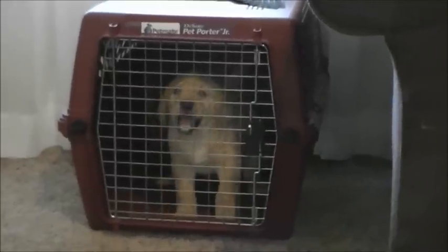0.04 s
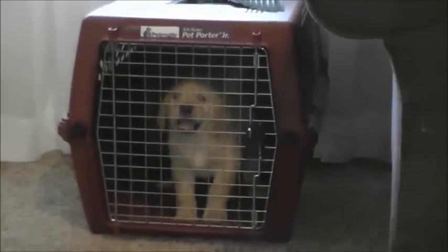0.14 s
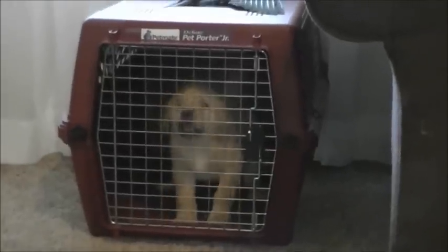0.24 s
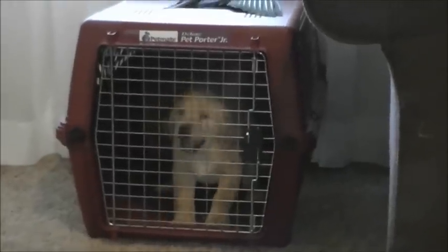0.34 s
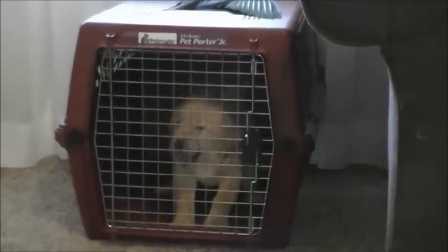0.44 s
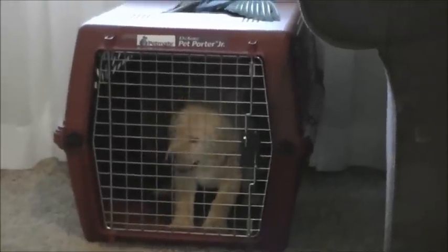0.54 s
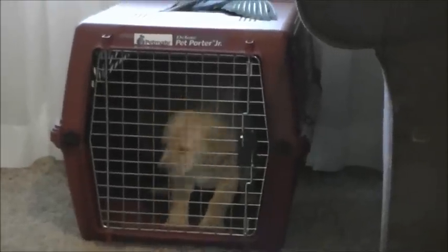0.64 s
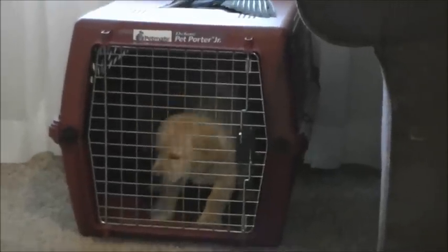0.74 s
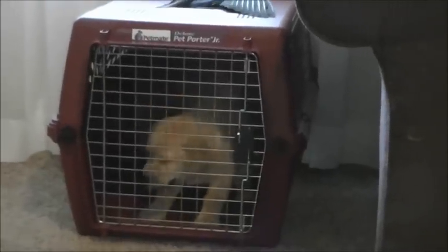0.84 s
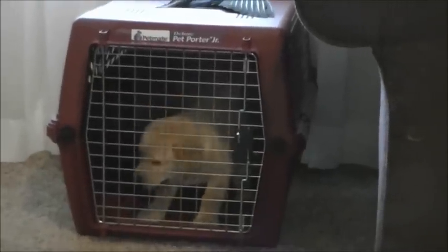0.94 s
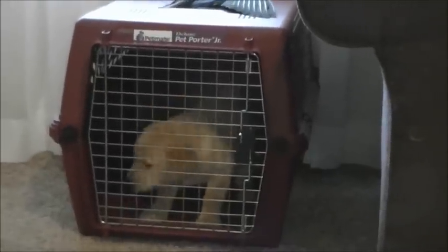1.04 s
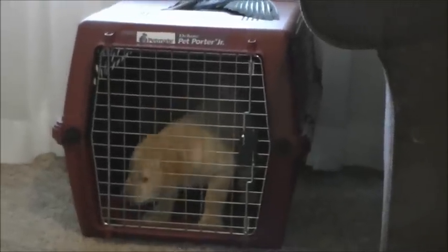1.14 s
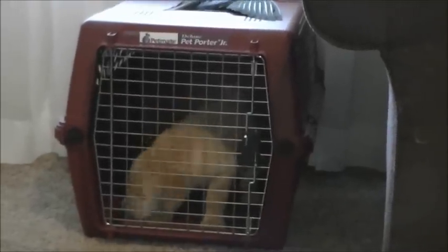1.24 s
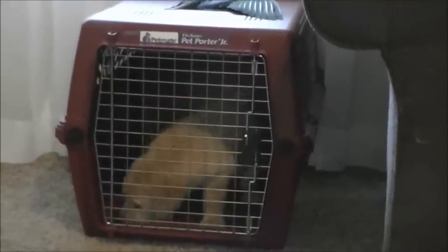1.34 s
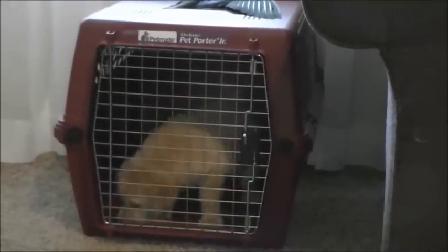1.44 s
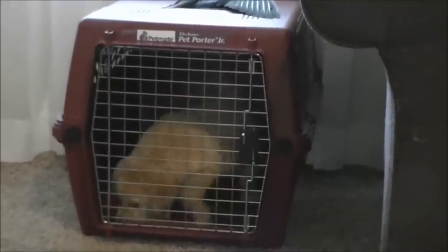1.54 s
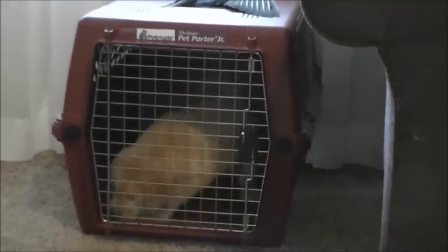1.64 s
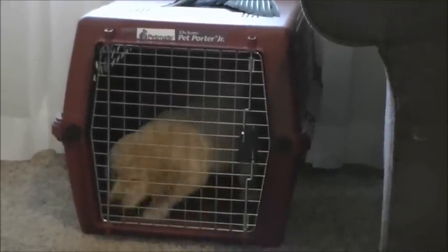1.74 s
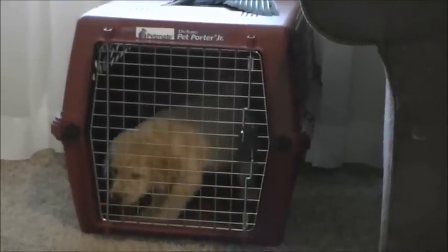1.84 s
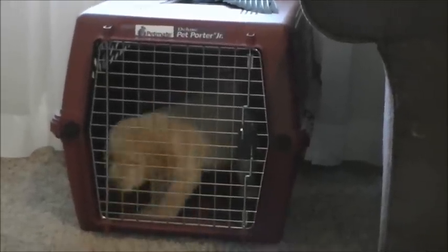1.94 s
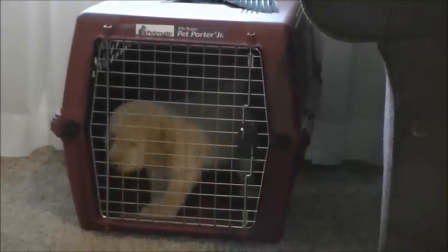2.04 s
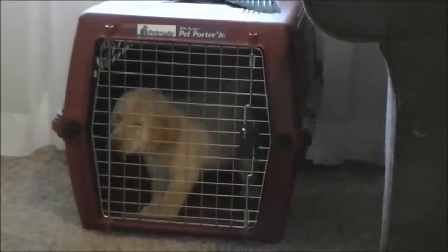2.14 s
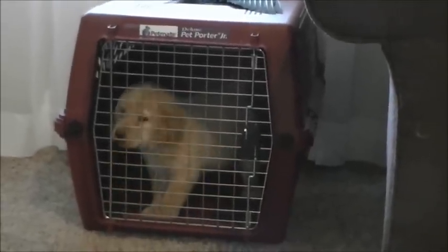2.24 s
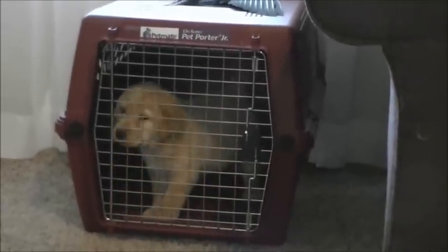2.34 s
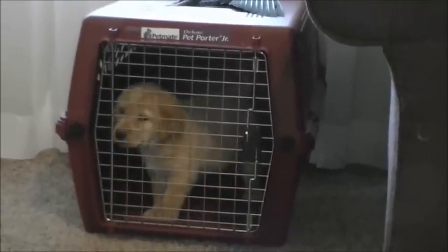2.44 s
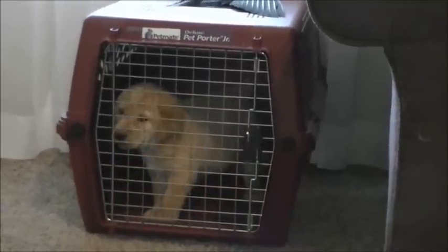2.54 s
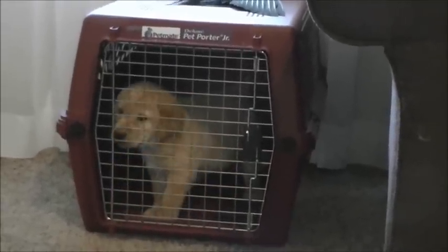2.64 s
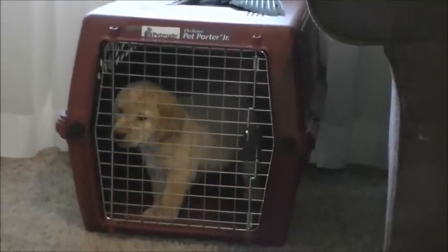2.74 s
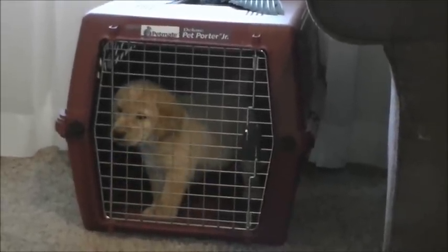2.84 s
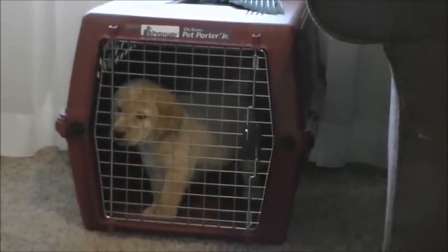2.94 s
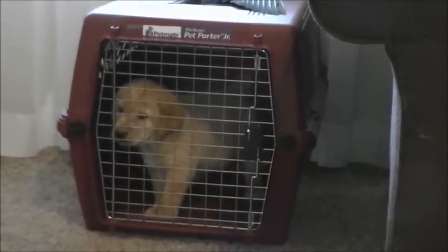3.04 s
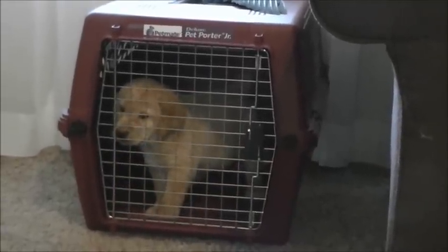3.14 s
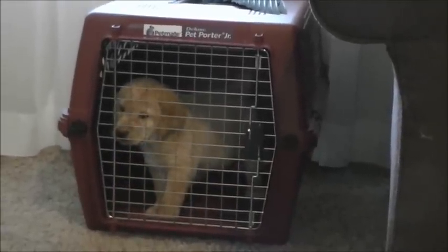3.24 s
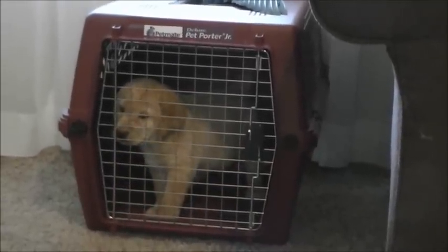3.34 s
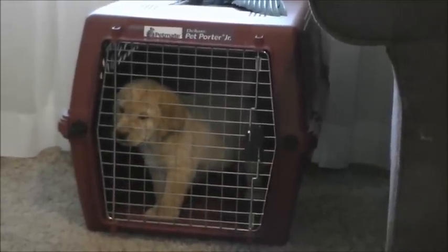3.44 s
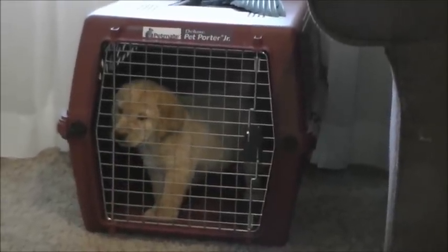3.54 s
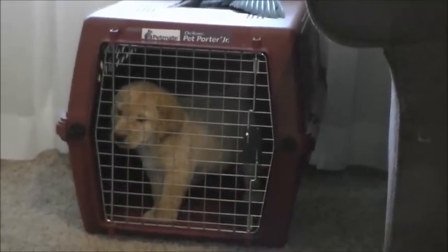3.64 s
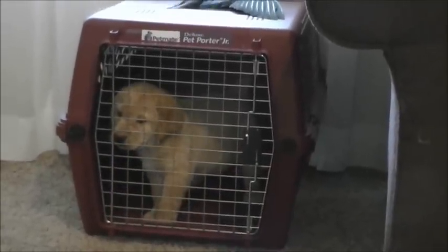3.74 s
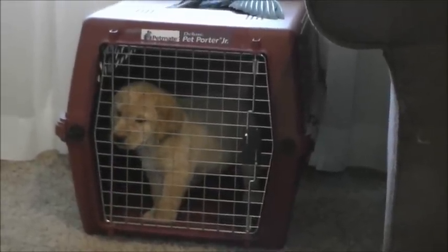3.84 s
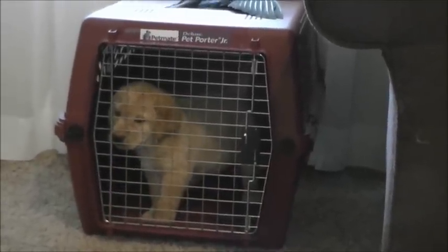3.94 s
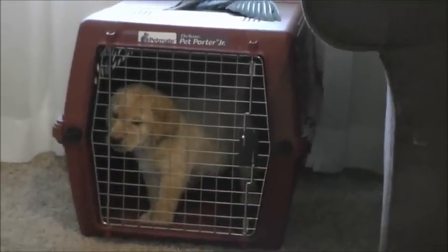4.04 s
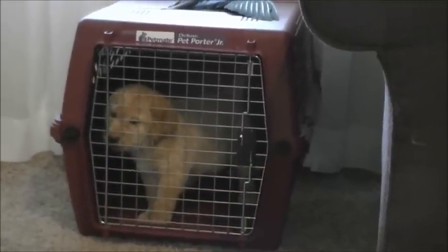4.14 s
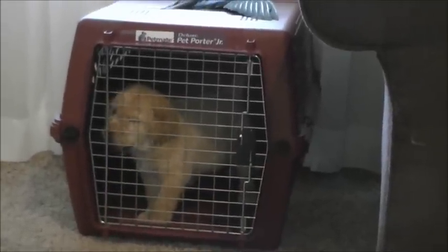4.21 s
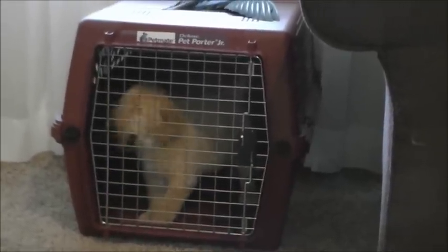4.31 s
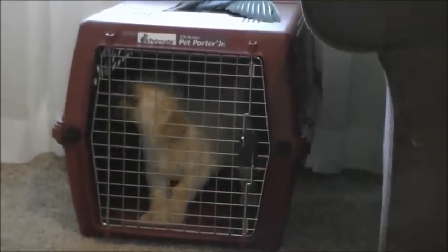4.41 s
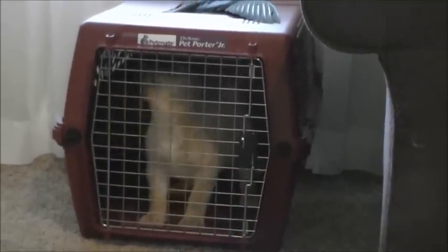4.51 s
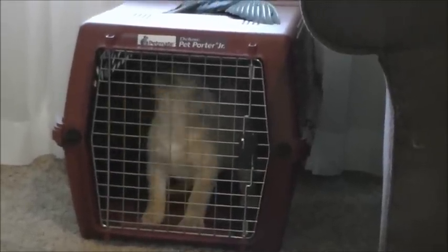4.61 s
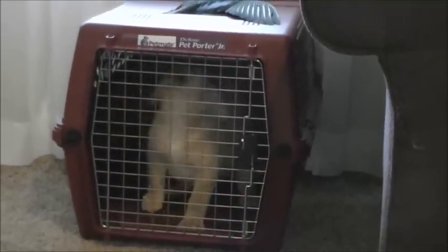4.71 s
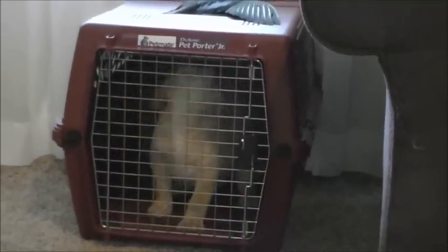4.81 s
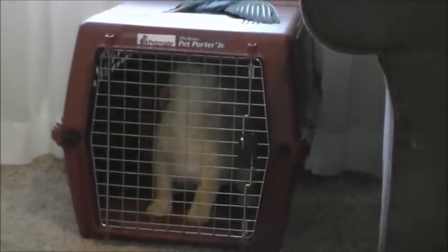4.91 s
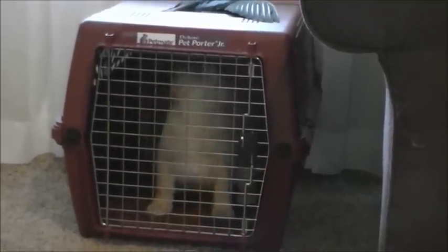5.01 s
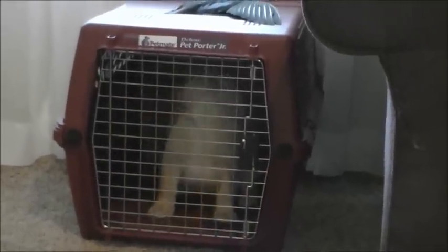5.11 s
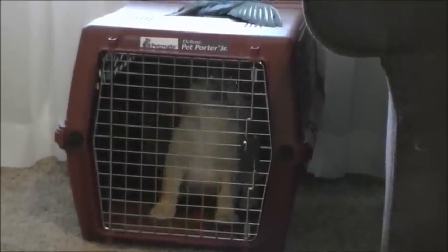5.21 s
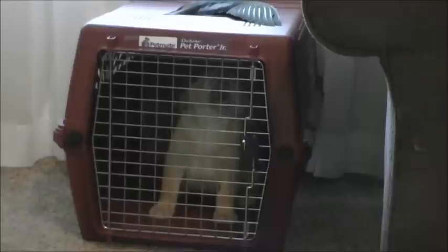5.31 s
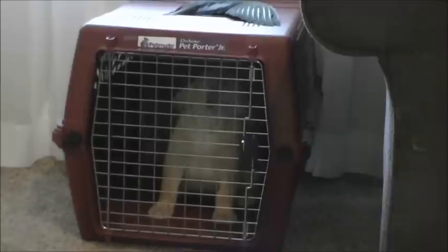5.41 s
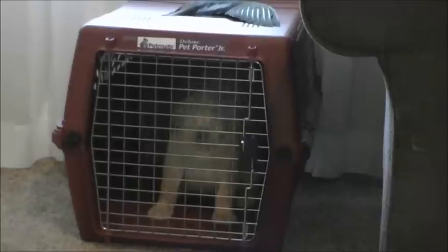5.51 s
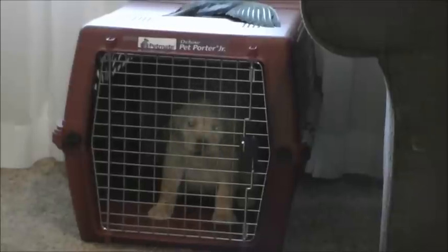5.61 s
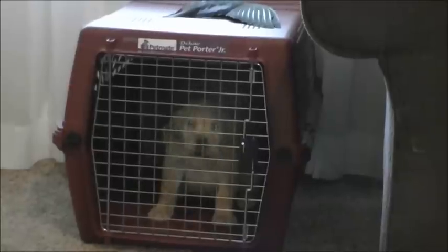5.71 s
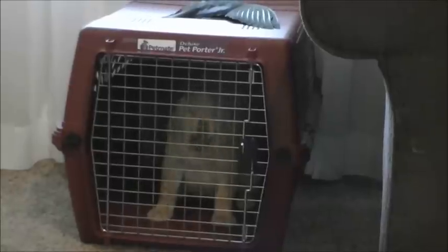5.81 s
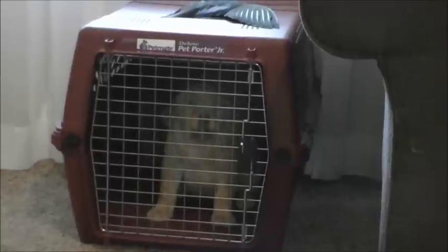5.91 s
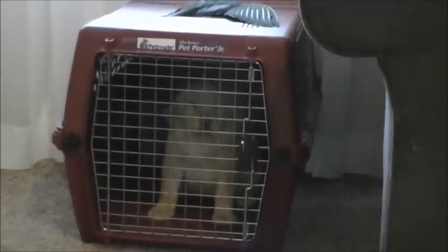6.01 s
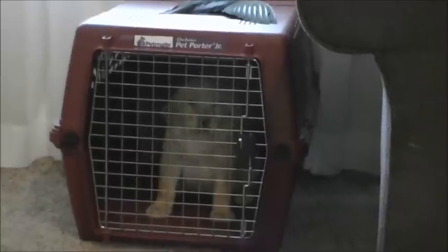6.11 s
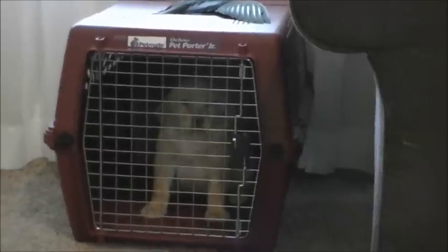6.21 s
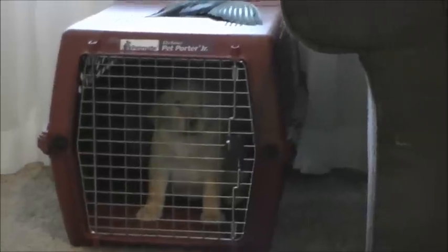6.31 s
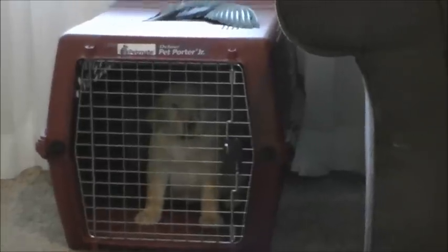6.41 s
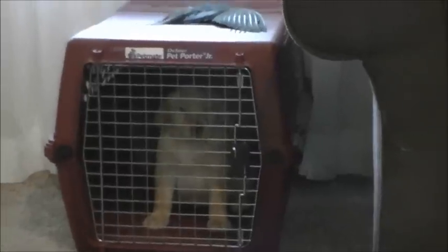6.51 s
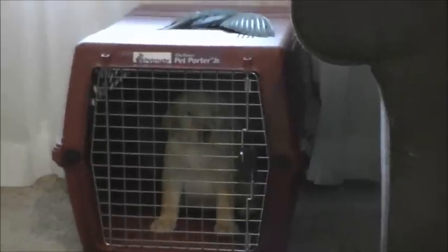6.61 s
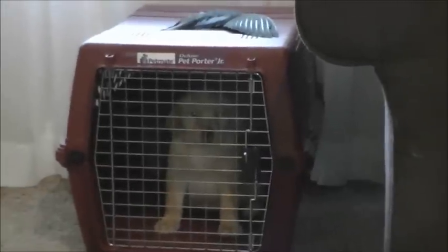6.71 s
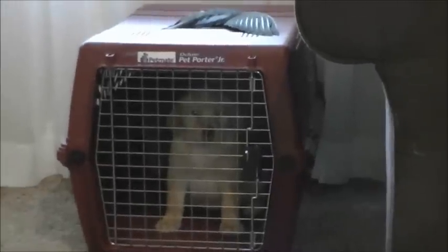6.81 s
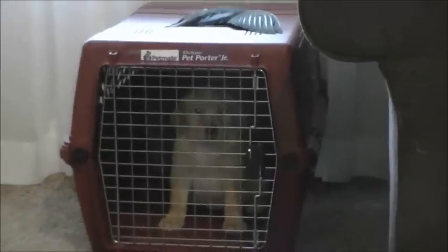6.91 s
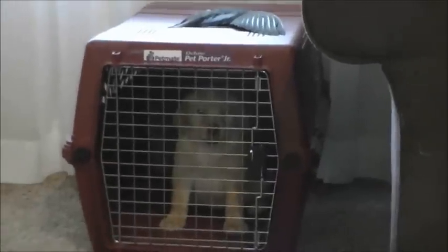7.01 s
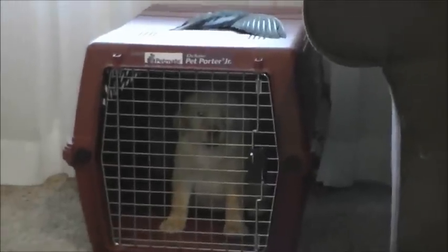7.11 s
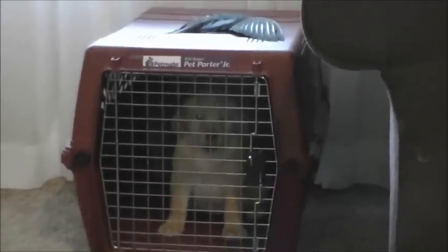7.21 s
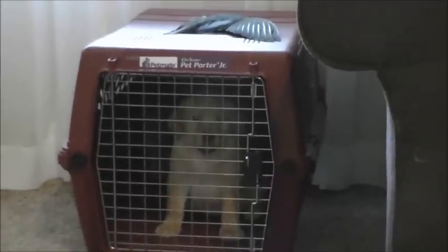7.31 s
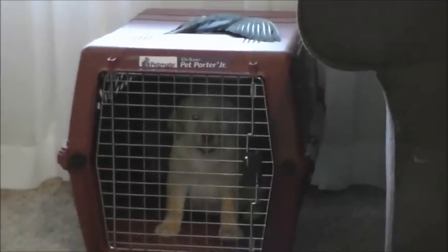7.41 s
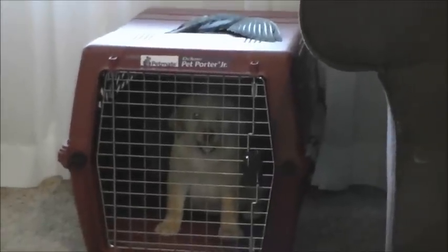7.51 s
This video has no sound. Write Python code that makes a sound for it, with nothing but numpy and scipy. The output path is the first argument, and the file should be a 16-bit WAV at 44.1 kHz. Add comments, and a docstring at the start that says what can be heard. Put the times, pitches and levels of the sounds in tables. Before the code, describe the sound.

A puppy cries in a plastic crate in a carpeted room, over soft air and a faint steady appliance hum. Piercing whines, each falling in pitch, come at 0.0, 0.35 and 0.85 seconds, then a short faint one at 1.35 and a lower, weak one from 1.7 to 1.95. Claw ticks and a sniff fall near 1.45. From 2.2 to 3.9 the puppy is silent; cloth slides close to the microphone, strongest after 3.0, and paws thud and scuff the hollow floor, clustered around 3.6 to 3.75. Another brief rustle at 4.1 leads to four loud yelps at 4.2, 4.8, 5.3 and 5.8, cracking and hoarse, the last sliding down long. Paws bump at 4.67 and 5.15. Two low, falling moans follow at 6.4 and 7.05, with breathy snuffles between and a final one at 7.45. Close crate reflections and a short room tail surround it.

```python
"""A carpeted room, in stereo: a puppy whines and yelps in a plastic crate. Five falling whines, a pause,
four loud yelps that crack and turn hoarse, then two low moans, with snuffles and lone tones.
Its voice is a stack of harmonics shaped by throat and mouth. Paws bump the crate floor as noise thuds
and ringing panel modes; cloth rustles close by as filtered noise; an appliance hums in steady partials.
Crate reflections and a room tail surround the voice and paws."""
import sys
import numpy as np
from scipy import signal
from scipy.fft import rfft, irfft, next_fast_len
from scipy.io import wavfile
from scipy.ndimage import uniform_filter1d, minimum_filter1d

SR = 44100
rng = np.random.default_rng(int(sys.argv[2]) if len(sys.argv) > 2 else 0)


def dump(signal):
    """Clip the signal to [-1, 1] and save it as 16-bit WAV at the path in sys.argv[1]."""
    limited = np.clip(np.atleast_2d(signal).T, -1, 1)
    pcm = np.round(limited * 32767).astype(np.int16)
    wavfile.write(sys.argv[1], SR, pcm)


N = 332955
TIME = np.arange(N) / SR
CUTOFF_HZ = 15800  # top of the voice's harmonics and of the room's response


def from_db(db):
    """Decibels to gain."""
    return 10 ** (np.asarray(db) / 20)


def rms_one(x):
    """Scale to unit power."""
    return x / np.sqrt(np.mean(np.abs(x) ** 2) + 1e-20)


def in_time(rows, t=TIME):
    """The columns of a curve, after its time column, read at the times t."""
    s, *columns = np.transpose(rows)
    return [np.interp(t, s, c) for c in columns]


def at_hz(points, hz):
    """Read a spectrum on a log-frequency axis."""
    f, value = np.transpose(points)
    return np.interp(np.log(hz), np.log(f), value)


def gate(t, start, end, edge_s=0.0009):
    """One between start and end, with smooth edges."""
    inside = np.minimum(t - start, end - t) / edge_s + .5
    return np.sin(np.pi / 2 * np.clip(inside, 0, 1)) ** 2


def band(x, low_hz, high_hz):
    """Causal band-pass."""
    sos = signal.butter(2, [low_hz, min(high_hz, SR / 2 - 1)], "band", fs=SR, output="sos")
    return signal.sosfilt(sos, x + 1e-18)


def flutter(size, hz):
    """Random motion mostly slower than hz, spread about 1, drawn on every 16th sample."""
    n = next_fast_len(size // 16 + 2)
    f = np.fft.rfftfreq(n, 16 / SR)
    slow = rms_one(irfft(rfft(rng.standard_normal(n)) / (1 + (f / hz) ** 2), n))
    return np.interp(np.arange(size) / 16, np.arange(n), slow)


def noise(spectrum, size=N):
    """Stereo noise of a given colour, about unit rms, its channels more alike in some bands than others."""
    # likeness of left and right: f/Hz, correlation [0-1]
    likeness = [(60, 0.9), (140, 0.2), (350, 0.63), (840, 0.5), (2020, 0.55), (4860, 0.47)]
    n = next_fast_len(size)
    hz = np.fft.rfftfreq(n, 1 / SR) + 1
    mid, side = rfft(rng.standard_normal((2, n)))
    alike = np.clip(at_hz(likeness, hz), 0, 1)
    # roll off beyond the first and last points of the spectrum
    low_edge = 1 + (spectrum[0][0] / hz) ** 8
    high_edge = 1 + (hz / spectrum[-1][0]) ** 8
    colour = from_db(at_hz(spectrum, hz)) / np.sqrt(low_edge * high_edge)
    both = np.sqrt(1 + alike) * mid + np.sqrt(1 - alike) * side * [[1], [-1]]
    return rms_one(irfft(both * colour, n)[:, :size])


def add(out, s, sound):
    """Mix a sound in at time s."""
    i = max(int(s * SR), 0)
    out[..., i:i + sound.shape[-1]] += sound[..., :N - i]


def background(air_db=-46, hum_db=-1, waver_db=0.0):
    """Room air as coloured noise, and an appliance's partials, their phases wavering slowly."""
    # the background sinks and swells: t/s, relative level/dB
    swells = [(0, -1), (.6, -7.5), (1.3, -5), (2.2, -3), (3, -0.5), (4.2, 2), (4.3, -10.5), (5.1, -10.5),
              (6, -5), (6.6, -3), (7.55, -3)]
    # colour of the room air: f/Hz, relative level/dB
    air_colour = [(25, -35.5), (60, -18.5), (110, -14.5), (220, -16), (300, -8.5), (400, -12), (450, -16.5),
                  (600, -11.5), (900, -20), (1800, -22), (3000, -29.5), (8000, -38.5), (11000, -43),
                  (15500, -70)]
    # appliance partials: f/Hz, rms level before the trims/dB
    partials = [(118.4, -57.5), (199.2, -60.5), (339.1, -57.5), (398.4, -51), (845.2, -60.5)]
    hum = np.zeros(N)
    for hz, db in partials:
        level = from_db(db + hum_db + waver_db * flutter(N, 5))
        hum += level * np.sqrt(2) * np.sin(2 * np.pi * hz * TIME + 0.28 * flutter(N, 1.5))
    return from_db(in_time(swells)[0]) * (from_db(air_db) * noise(air_colour) + hum)


def cloth(grain_db=1.5, edge_s=0.054, swell_db=8.5):
    """Cloth slides close by in strokes that swell and fade: a dull rub and a grainy hiss."""
    # strokes: start t/s, end t/s, rub level/dB, hiss level/dB (both midway, before the output trim)
    strokes = [(2.221, 2.803, -54.5, -49.5), (2.8, 2.983, -57, -53), (3.002, 3.652, -43, -45.5),
               (3.63, 3.902, -42.5, -54), (4.093, 4.24, -43.5, -43)]
    # colour of the rub: f/Hz, relative level/dB
    rub_colour = [(150, -8), (270, -17.5), (550, -12), (1100, -15.5), (2400, -20), (3500, -37)]
    # colour of the hiss: f/Hz, relative level/dB
    hiss_colour = [(2000, 3), (3000, 4), (5500, 0.5), (7000, 2), (9000, -2), (11000, -11.5), (13000, -18),
                   (15500, -31)]
    rub, hiss = np.zeros((2, N))
    for start, end, rub_db, hiss_db in strokes:
        off_centre = (2 * TIME - start - end) / (end - start)
        # weaker by swell_db at its ends than midway
        swell = from_db(-swell_db * np.minimum(off_centre ** 2, 2))
        stroke = gate(TIME, start, end, edge_s) * swell
        rub += from_db(rub_db) * stroke
        hiss += from_db(hiss_db) * stroke
    grain = from_db(grain_db * flutter(N, 60))
    return rub * noise(rub_colour) + hiss * grain * noise(hiss_colour)


def room(x, tail_db=-13, crate_db=-15, crate_t60_s=0.017, ring_t60_s=1.0):
    """Quick reflections inside the crate, then the room's tail, dying band by band, and its ringing modes."""
    # colour of the tail: f/Hz, relative level/dB
    tail_colour = [(300, 8.5), (700, 3), (1200, 6.5), (2500, 1.5), (4200, 7), (7000, 4.5), (12000, 2.5)]
    # left-right difference of the reflections: f/Hz, level against the middle/dB
    side_width = [(300, -9.5), (1200, -11), (4500, -6), (8000, -20.5), (14000, 9.5)]
    # pitches at which the room rings on: f/Hz, relative level/dB
    rings = [(1125, -20), (1384, -14), (2650, 5), (2854, -1), (3381, -54), (4167, -40)]
    # the tail lasts longest in the middle register and shortens by about this share an octave either side
    longest_t60_s, longest_hz, shortening = 0.7, 1270, 0.089
    t = np.arange(SR * 3 // 4) / SR
    edges = np.geomspace(100, CUTOFF_HZ, 9)
    response = np.zeros((2, len(t)))  # middle and side
    for low, high in zip(edges, edges[1:]):
        hz = np.sqrt(low * high)
        t60_s = longest_t60_s * np.exp(-shortening * abs(np.log2(hz / longest_hz)))
        tail = rms_one(from_db(-60 * t / t60_s) * gate(t, 0.0089, 1))
        early = rms_one(from_db(-60 * t / crate_t60_s) * (t > .002))
        tail_gain = from_db(tail_db + at_hz(tail_colour, hz))
        shape = np.hypot(tail_gain * tail, from_db(crate_db) * early)
        width = from_db([[0], [at_hz(side_width, hz)]])
        grains = band(rng.standard_normal((2, len(t))), low, high)
        response += grains * shape * width / np.sqrt(len(t))
    fade = from_db(-60 * t / ring_t60_s)
    for hz, db in rings:
        response[0] += from_db(db) * np.sin(2 * np.pi * hz * t) * 2 * fade / fade.sum()
    mid, side = signal.fftconvolve(x[None], response, axes=1)[:, :N]
    return x + mid + side * [[1], [-1]]


def paws(thud_db=2, knock_db=-1, scuff_db=-3, thud_t60_s=0.18, scuff_t60_s=0.2, panel_t60_s=0.11,
         touch_s=0.0043, claw_db=-10, claw_t60_s=0.082):
    """Soft paws thud and scuff on the floor and set the panel ringing; claws add ticks of bright noise."""
    # paws on the crate floor: t/s, thud level/dB, panel and scuff level/dB (before the trims)
    footfalls = [(0.162, -38.5, -60), (0.9, -51, -45), (2.058, -62, -48), (2.236, -65, -49),
                 (2.863, -42, -55), (3.601, -39, -62), (3.638, -38, -42), (3.68, -41, -25.5),
                 (3.704, -54, -30.5), (3.748, -50, -48), (4.666, -47, -29.5), (5.146, -40, -31),
                 (5.18, -41, -29)]
    # ringing modes of the floor panel: f/Hz, typical relative level/dB
    panel_modes = [(338, 7), (393, 15), (502, 2), (700, -43), (800, -26), (1114, -11), (1410, 3), (2250, 2),
                   (2550, -4)]
    # claws on the plastic and the wire door: t/s, level before the trims/dB
    ticks = [(1.4414, -31), (1.4924, -29.5), (4.6697, -36), (5.1405, -37), (5.157, -39), (5.1819, -40),
             (6.845, -69)]
    out, t = np.zeros(N), np.arange(SR // 2) / SR

    def burst(low_hz, high_hz, db, t60_s):
        """Band noise that dies away exponentially."""
        return rms_one(band(rng.standard_normal(len(t)), low_hz, high_hz)) * from_db(db - 60 * t / t60_s)

    hz, mode_db = np.transpose(panel_modes)[:, :, None]
    for s, low_db, panel_db in footfalls:
        thud = burst(106, 196, thud_db, thud_t60_s)
        scuff = burst(410, 1050, scuff_db, scuff_t60_s)
        # each bump excites the modes in a different mixture
        strength = from_db(mode_db) * rng.normal(1, 1.0, hz.shape) * rng.choice([-1, 1], hz.shape)
        ringing = (strength * np.sin(2 * np.pi * hz * t)).sum(0) / np.linalg.norm(strength)
        knock = ringing * from_db(knock_db - 60 * t / panel_t60_s)
        bump = from_db(low_db) * thud + from_db(panel_db) * (knock + scuff)
        add(out, s, bump * (1 - np.exp(-t / touch_s)))
    for s, db in ticks:
        add(out, s, burst(4900, 7700, db + claw_db, claw_t60_s))
    return out


def snuffles(grain_db=4.0, rise_db=6, trim_db=1.0, edge_s=0.032):
    """Short breaths: noise coloured by the snout, with one mouth resonance, swelling towards the end."""
    # snuffles: start t/s, end t/s, level before the trims/dB, mouth resonance f/Hz
    breaths = [(1.412, 1.504, -43.5, 5050), (1.92, 1.932, -46, 8450), (2.037, 2.081, -49, 1410),
               (6.278, 6.354, -52, 780), (6.43, 6.52, -48, 2930), (6.568, 6.678, -53.5, 3000),
               (6.755, 6.847, -52.5, 1800), (7.451, 7.528, -41, 1945)]
    # colour of the snout: f/Hz, relative level/dB
    snout = [(650, 17), (1000, 5.5), (1900, 7.5), (2700, 4.5), (4000, -1.5), (4900, 1), (7000, -7.5),
             (8700, -2), (11000, -15), (15000, -26)]
    out = np.zeros(N)
    for start, end, db, hz in breaths:
        t = np.arange(start - .02, end + .02, 1 / SR)
        air = noise(snout, size=len(t))[0]
        mouth = rms_one(air + 2.2 * band(air, hz, hz * 1.054))
        rise = rise_db * ((t - start) / (end - start) - .5)
        level = from_db(db + trim_db + rise + grain_db * flutter(len(t), 45))
        add(out, t[0], level * mouth * gate(t, start, end, edge_s))
    return out


def tone(rows, waver=0.01):
    """A single partial whose pitch wavers at random."""
    t = np.arange(rows[0][0], rows[-1][0], 1 / SR)
    hz, db = in_time(rows, t)
    phase = 2 * np.pi * np.cumsum(hz * (1 + waver * flutter(len(t), 160))) / SR
    return np.sqrt(2) * from_db(db) * np.sin(phase) * signal.windows.tukey(len(t), .1)


def cry(rows, colour, facing, jitter=0.0046, hoarse_jitter=0.0289, rasp_hz=240, breath_db=-30,
        fundamental_db=-0.07, overtones_db=-2.15, shimmer_db=3, top_harmonics_db=-0.5,
        whistle_db=-4, whistle_swing=0.78, whistle_jitter=0.0073):
    """Harmonics of the vocal folds through the throat; hoarseness smears each into a band."""
    # the vocal folds turn chaotic: start t/s, end t/s, roughness [0-1]
    hoarse = [(.17, .21, .25), (.385, .435, .15), (.62, .665, .25), (1.06, 1.105, .3), (1.69, 1.765, .15),
              (4.253, 4.32, .62), (4.32, 4.36, .3), (4.47, 4.515, .65), (4.828, 4.925, .5),
              (4.925, 5.1, .35), (5.395, 5.41, .4), (5.41, 5.45, .15), (6.43, 6.585, .2), (6.585, 6.66, .5),
              (6.745, 6.81, .55), (7.095, 7.12, .4)]
    # the folds double their period: start t/s, end t/s, relative half-harmonic level/dB
    cracks = [(4.281, 4.31, -3), (4.451, 4.519, 0), (4.835, 4.912, 2.5), (5.368, 5.406, 0),
              (6.583, 6.65, -9)]
    # throat and mouth: f/Hz, relative level/dB
    throat = [(1500, 13), (2300, -24), (2900, 11.5), (3400, 3.5), (4100, 6), (4700, 5), (5500, -9),
              (6500, -13), (7400, -18.5), (8500, -18), (10500, -25.5), (12000, -38), (15500, -63.5)]
    # how the mouth weights the second and third harmonics: f/Hz, relative level/dB
    mouth = [(1050, 11), (1450, 20.5), (1750, 10.5), (2000, 9), (2300, 9), (2650, 6), (2850, 11),
             (3300, 4.5), (3700, 4), (4150, 6), (4500, -1.5)]
    top_hz = 7000  # the upper harmonics take over around here
    hollow_db, hollow_width_hz = -12, 350
    # a thin whistle sinks through each cry and takes a share of the overtones' swing
    whistle_start_hz, whistle_end_hz, whistle_follows, whistle_attack_s = 10970, 10150, 0.34, .015

    start, end = rows[0][0], rows[-1][0]
    t = np.arange(max(start - .004, 0), end + 0.00814, 1 / SR)
    size = len(t)
    pitch, first_db, bright_db, tilt_db = in_time(rows, t)
    second_db, third_db, top_db = colour
    hollow_hz, top_tilt_db = facing

    # the level that whistle and upper harmonics share
    attack = np.clip((t - start) / whistle_attack_s, 0, 1)
    top = from_db(top_db + whistle_follows * (bright_db - bright_db.max())) * attack
    low_cut = signal.butter(6, .85 * np.percentile(pitch, 20), "high", fs=SR, output="sos")
    rough = np.clip(sum(r * gate(t, a, b) for a, b, r in hoarse), 0, 1)
    half = sum(from_db(db) * gate(t, a, b) for a, b, db in cracks)
    pitch = pitch * (1 + jitter * flutter(size, 70) + hoarse_jitter * rough * flutter(size, 137))
    phase = 2 * np.pi * np.cumsum(pitch) / SR
    hz = np.arange(1, 18)[:, None] * pitch

    # the overtones share their power as throat and mouth dictate
    weight = from_db(at_hz(throat, hz)) * (hz < CUTOFF_HZ)
    weight[0] = 0
    weight[1:3] = from_db(at_hz(mouth, hz[1:3]) + [[second_db], [third_db]])
    weight *= from_db(hollow_db * np.exp(-((hz - hollow_hz) / hollow_width_hz) ** 2))
    # the higher harmonics shimmer, each on its own
    weight[3:] *= from_db(shimmer_db * np.array([flutter(size, 36) for _ in weight[3:]]))
    high = np.clip((hz - top_hz) / 2500 + .5, 0, 1)
    lower = weight * (1 - high) * from_db(tilt_db * np.log2(np.minimum(hz, 4300)))
    upper = weight * high * from_db(top_tilt_db * np.log2(np.maximum(hz / top_hz, 1)))
    height = lower * from_db(bright_db + overtones_db) / np.linalg.norm(lower, axis=0)
    height += upper * top * from_db(top_harmonics_db) / np.linalg.norm(upper, axis=0)
    height[0] = from_db(first_db + fundamental_db)

    out = np.zeros(size)
    for n, (own, above) in enumerate(zip(height, height[1:]), 1):
        smear = np.clip(rough * np.sqrt(n) * 0.96 + from_db(breath_db) * n, 0, .95)
        clean = np.sqrt(1 - smear ** 2)
        rasp = (flutter(size, rasp_hz) + 1j * flutter(size, rasp_hz)) / np.sqrt(2)
        turn = np.exp(1j * (n * phase + rng.uniform(0, 2 * np.pi)))
        out += own * (turn * (clean + smear * rasp)).real
        # every other cycle differs: lines appear midway between the harmonics
        between = turn * np.exp(.5j * phase) * (clean + smear * rasp[::-1])
        out += half * np.sqrt(own * above) * between.real

    # the folds shake the whistle, which gains sidebands one pitch apart
    glide = np.linspace(whistle_start_hz, whistle_end_hz, size)
    whistle_hz = glide * (1 + whistle_jitter * flutter(size, 466))
    shaken = np.sin(2 * np.pi * np.cumsum(whistle_hz) / SR + whistle_swing * np.sin(phase))
    out += top * from_db(whistle_db) * band(shaken, 4500, 9760)
    return np.sqrt(2) * signal.sosfilt(low_cut, out * gate(t, start, end))


def puppy():
    """The voice: whines, yelps and moans, with lone tones and snuffles among them."""
    # one short curve a cry: t/s, pitch f/Hz, fundamental level/dB, overtone level/dB,
    # tilt of the overtones [dB per octave]; levels are before the trims
    whines = [
        [(0.0, 1326, -10, -16, -1), (0.034, 1366, -11.5, -10.5, 23), (0.106, 1397, -6, -12, 17),
         (0.124, 1352, -16, -22.5, 2), (0.133, 1304, -42, -33, -2), (0.142, 1342, -17, -30, 3),
         (0.151, 1310, -19.5, -25, 10), (0.184, 1221, -18, -22, -10), (0.205, 870, -47, -24.5, -9)],
        [(0.352, 823, -31, -43, -19), (0.374, 878, -33, -16.5, -3.5), (0.395, 1092, -15.5, -11.5, -7),
         (0.419, 1161, -22, -11, -3), (0.437, 1370, -10.5, -6.5, -24.5), (0.455, 1356, -24.5, -43, 13),
         (0.494, 1220, -24.5, -28.5, 8), (0.617, 1157, -27.5, -36, 21), (0.635, 1084, -20.5, -29, 7),
         (0.66, 955, -46.5, -38, -3)],
        [(0.832, 938, -43, -56, -7.5), (0.857, 1110, -22.5, -32.5, 1), (0.899, 1323, -17, -15.5, -10),
         (0.917, 1357, -10.5, -20, 14), (0.941, 1340, -19.5, -30, 2), (0.959, 1267, -29, -29, 1),
         (0.983, 1230, -22, -32, -6), (1.067, 1130, -29, -37, 11), (1.1, 897, -39, -33, -15)],
        [(1.334, 1021, -30, -62, -5), (1.356, 1110, -30, -46, 17), (1.368, 1146, -22, -37, 18),
         (1.389, 1115, -23, -45, 2), (1.395, 1115, -67, -49, 15)],
        [(1.69, 809, -50.5, -46, 3), (1.715, 1053, -27.5, -44.5, 8), (1.733, 1070, -36.5, -47.5, 19),
         (1.772, 875, -28, -39.5, -4), (1.823, 853, -41.5, -38.0, 12), (1.877, 836, -28, -29, -1),
         (1.913, 813, -33.5, -34, 17), (1.946, 847.5, -33, -30.5, -10), (1.97, 757, -56, -54, 11)],
    ]
    # yelps, same columns: t/s, pitch f/Hz, fundamental level/dB, overtone level/dB, tilt [dB per octave]
    yelps = [
        [(4.21, 1170, -15, -28, -25), (4.22, 1039, -16.5, -15.5, -14), (4.244, 1174, -11.5, -9.5, -14),
         (4.274, 1021, -23, -18.5, 3), (4.301, 1045, -22.0, -15.5, 5), (4.328, 1296, -16.5, -15, -8),
         (4.361, 1380, -17.5, -21, 6), (4.376, 1390, -12.5, -10.5, 17), (4.409, 1451, -14, -17, -1),
         (4.445, 1271, 1, -16, 14), (4.46, 1232, -16, -32, 17), (4.475, 1276, -20, -21.5, -7),
         (4.544, 1459, -18, -10, -40), (4.565, 1470, -15.5, -47, -1)],
        [(4.8, 790, -31, -25.5, 9), (4.831, 1020, -17.5, -4.5, 0), (4.843, 1087, 1, -16.5, 1.5),
         (4.903, 1111, -27, -30.5, -17), (4.912, 1103, 1, -9.5, -25), (4.93, 1105, -35, -47, -13),
         (4.972, 1172, -19, -45, -4), (5.044, 1220, -37, -41, -9), (5.056, 1204, -22, -41, 1),
         (5.129, 984, -27.5, -44, -3)],
        [(5.291, 952, -32, -61, 31), (5.316, 966, -20, -13, -2.5), (5.337, 1104, -5.5, -10, 3.5),
         (5.376, 1137, -5.5, -15, 10), (5.394, 1097, -41, -25, 3), (5.418, 1356, -12.5, -7.5, -31),
         (5.448, 1273, -33, -38, -20), (5.487, 1197, -39, -21, -13), (5.499, 1110, -19.5, -37, 4),
         (5.507, 1123, -33.5, -28, -9), (5.603, 1059, -24.5, -38, 11), (5.624, 916, -31, -36, 6)],
        [(5.801, 1020, -33, -55, 11), (5.826, 963, -29, -54, 1), (5.85, 1044, -10, -14.5, -10),
         (5.88, 1112, -14.5, -14.5, 10), (5.904, 1251, -10, -18, -9), (5.922, 1235, -1.5, -27, 2),
         (5.945, 1135, -56, -23, 10), (5.972, 995, -32, -35.0, 16), (6.011, 939, -37, -33.5, 9),
         (6.056, 870, -28, -38.5, 1), (6.164, 770, -29.5, -33.5, 16), (6.19, 692, -33.5, -39, -4)],
    ]
    # moans, same columns: t/s, pitch f/Hz, fundamental level/dB, overtone level/dB, tilt [dB per octave]
    moans = [
        [(6.39, 817, -47, -64, -9), (6.43, 1036, -31.5, -52, 1), (6.457, 1038, -36.5, -41.5, -11),
         (6.523, 868, -33.5, -45, -4), (6.556, 912, -32, -44, -5), (6.577, 820, -35.5, -42, -7),
         (6.607, 771.3, -31, -35.5, -1.5), (6.7, 701, -35.5, -36.5, -5.5), (6.766, 671, -25, -32.5, -6),
         (6.81, 574, -32, -31.5, -8.5)],
        [(7.03, 777, -50, -46, 5), (7.085, 850, -35.5, -45, 7.5), (7.136, 747, -33.5, -33, 4.5),
         (7.217, 730.5, -40, -31.5, 1.5), (7.297, 625.5, -23.5, -36, 3), (7.327, 601.5, -40, -45, 18),
         (7.342, 567, -23, -36, 1.5), (7.381, 538, -43, -34.5, 3), (7.393, 535, -21.0, -33.5, 5),
         (7.449, 511, -39, -42.5, -9)],
    ]
    # colour of each cry in that order: second harmonic, third harmonic, whistle, each relative level/dB
    colours = [(8, 7.5, -38), (-5, 3.5, -36.5), (1, 11, -36), (0, -7, -40), (6.5, -4, -42), (-3, 2, -44),
               (5.5, 1, -48), (0.5, 3, -45), (-0.5, 4.5, -44.5), (-5.5, 2.5, -65), (9.5, 2.5, -60)]
    # how the head faces the door, for each cry: band hollowed out by the crate f/Hz,
    # tilt of the top harmonics [dB per octave]
    facings = [(2900, -12), (2930, -3), (3110, 11), (3850, 6), (2160, 11.5), (3410, 14), (2535, 24),
               (3890, 29), (2730, 32), (2370, 44), (2440, 35)]
    # lone pure tones, high whistles and a second low voice: t/s, f/Hz, level before the trims/dB
    lone_tones = [
        [(1.39, 10200, -36), (1.42, 9900, -45), (1.5, 10200, -55)],
        [(2.22, 13330, -61), (2.24, 13270, -54), (2.26, 12440, -55)],
        [(6.42, 10930, -45), (6.48, 10700, -49.5), (6.59, 10800, -46)],
        [(6.45, 672, -29), (6.498, 712, -35.5), (6.56, 702, -56), (6.606, 646, -24.5), (6.682, 700.7, -51),
         (6.76, 621.5, -28.5), (6.84, 579, -35)],
    ]
    out = np.zeros(N)
    for rows, colour, facing in zip(whines + yelps + moans, colours, facings):
        add(out, rows[0][0] - .004, cry(rows, colour, facing))
    for rows in lone_tones:
        add(out, rows[0][0], tone(rows))
    return out + snuffles()


def scene(left_db=1.5, right_db=2.5, puppy_db=-1.5):
    """Voice and paws in the room, then cloth and background; the right channel is slightly stronger."""
    crate = room(from_db(puppy_db) * puppy() + paws())
    return (crate + cloth() + background()) * from_db([[left_db], [right_db]])


def record(dry, ceiling_db=-0.4):
    """A quick limiter, shared by both channels, holds down the loudest peaks; then the top is cut."""
    peak = np.abs(dry).max(axis=0)
    headroom = np.minimum(1, from_db(min(ceiling_db, 0)) / (peak + 1e-9))
    gain = uniform_filter1d(minimum_filter1d(headroom, size=441), size=441)  # about 10 ms
    top_cut = signal.cheby2(16, 70, CUTOFF_HZ + 600, fs=SR, output="sos")
    return signal.sosfilt(top_cut, dry * gain)


dry = scene()
out = record(dry)
dump(out)
```